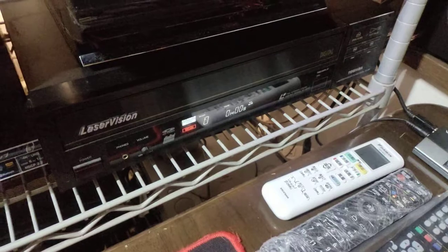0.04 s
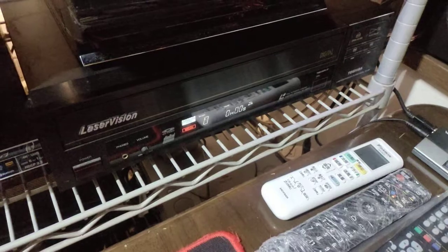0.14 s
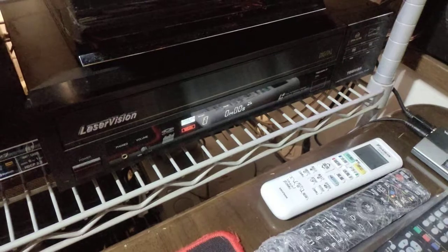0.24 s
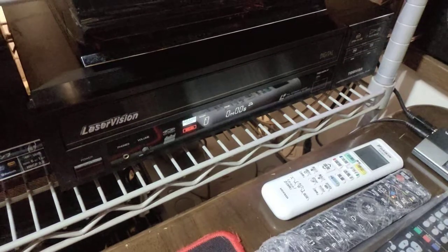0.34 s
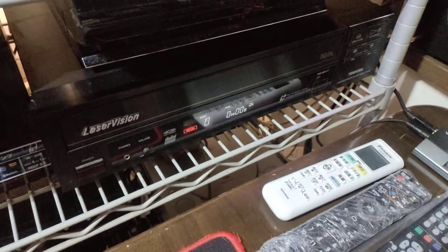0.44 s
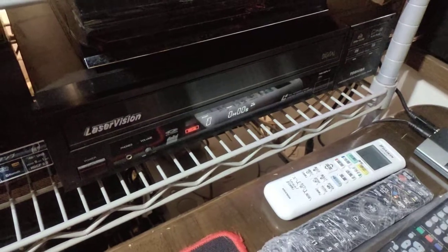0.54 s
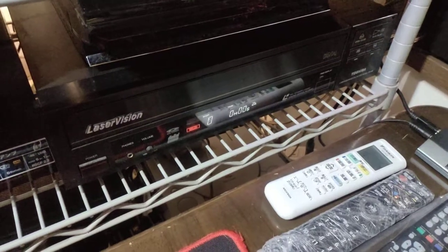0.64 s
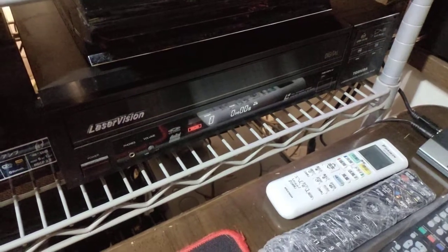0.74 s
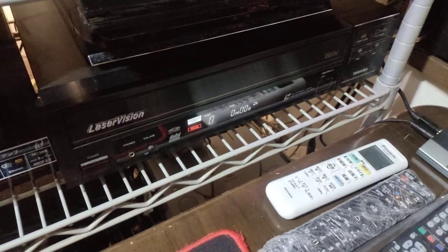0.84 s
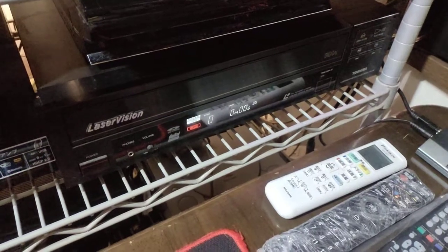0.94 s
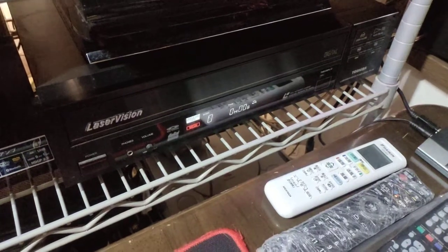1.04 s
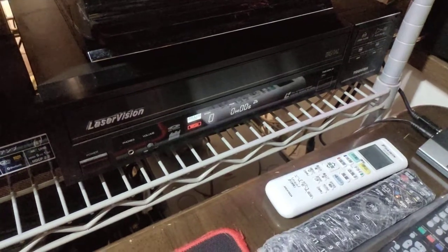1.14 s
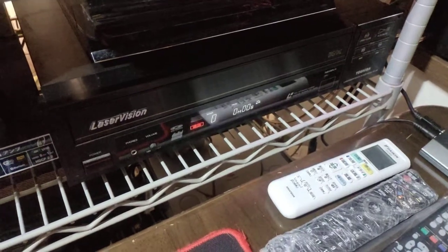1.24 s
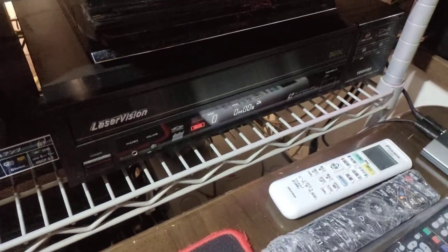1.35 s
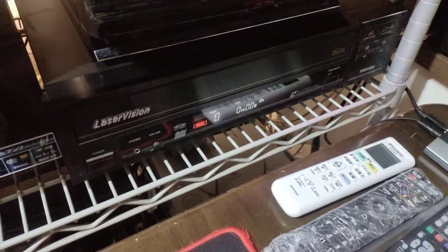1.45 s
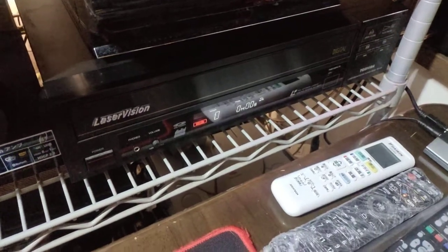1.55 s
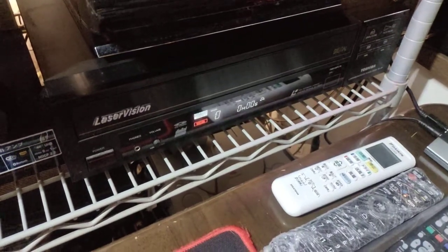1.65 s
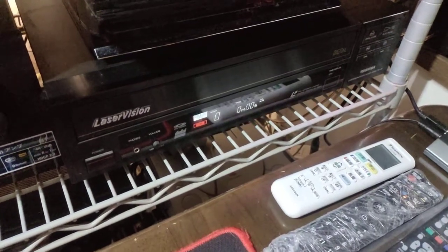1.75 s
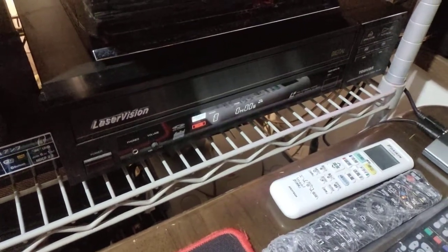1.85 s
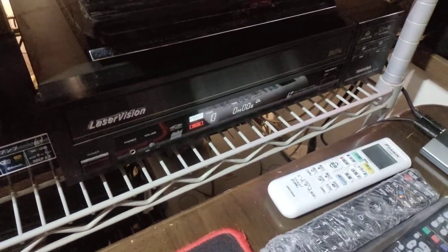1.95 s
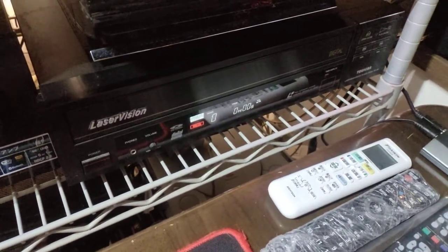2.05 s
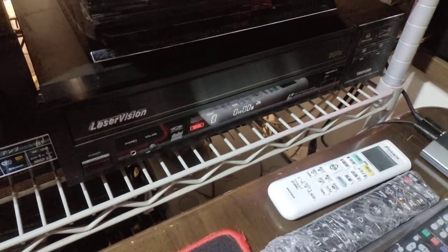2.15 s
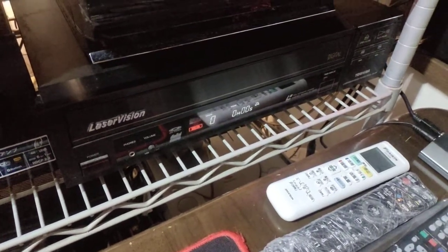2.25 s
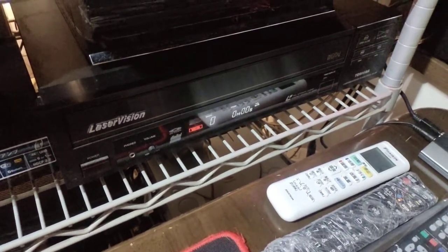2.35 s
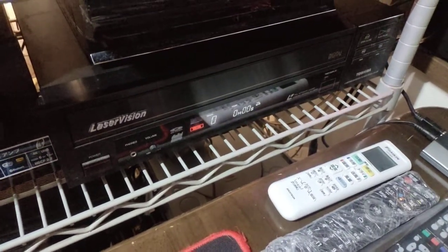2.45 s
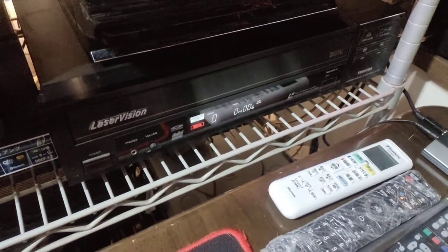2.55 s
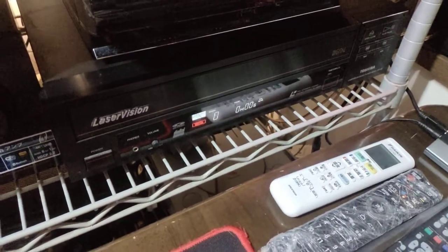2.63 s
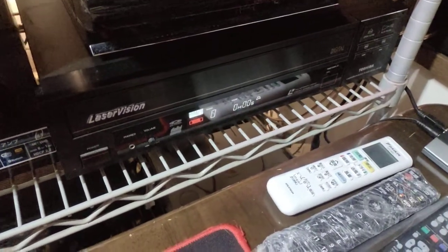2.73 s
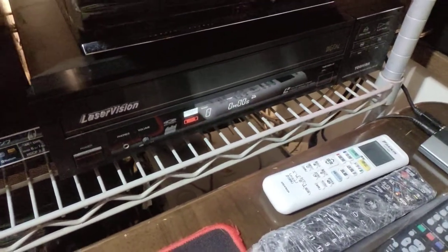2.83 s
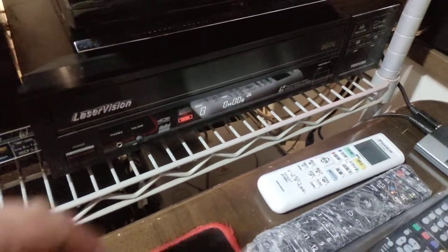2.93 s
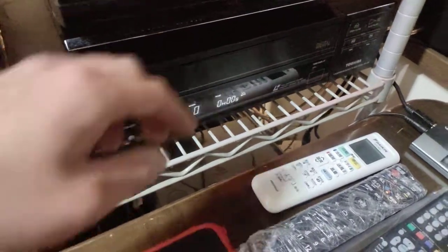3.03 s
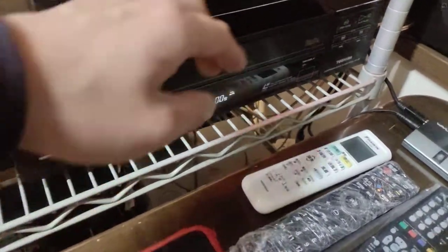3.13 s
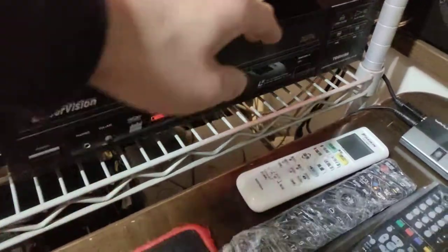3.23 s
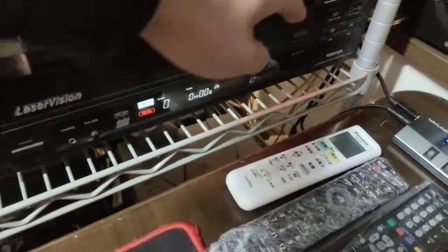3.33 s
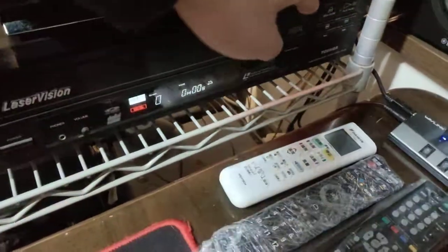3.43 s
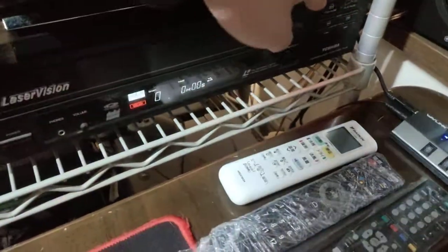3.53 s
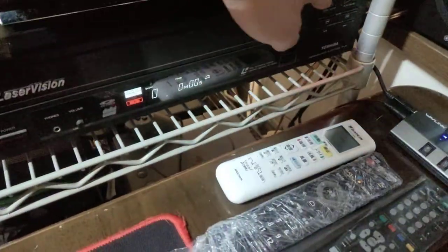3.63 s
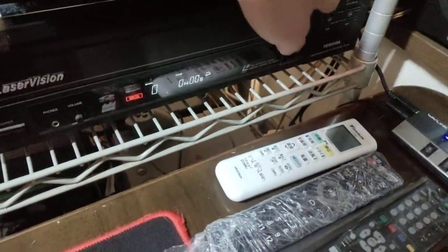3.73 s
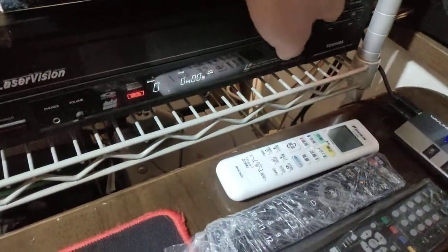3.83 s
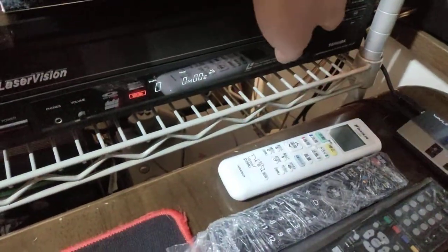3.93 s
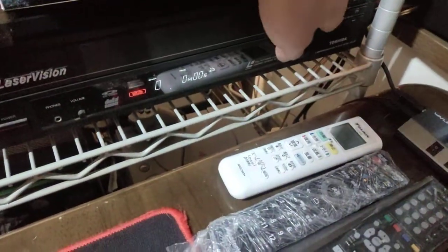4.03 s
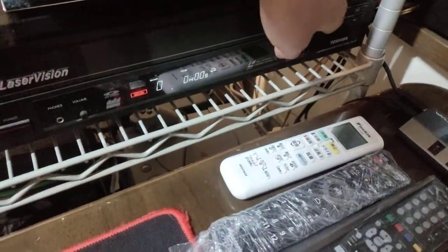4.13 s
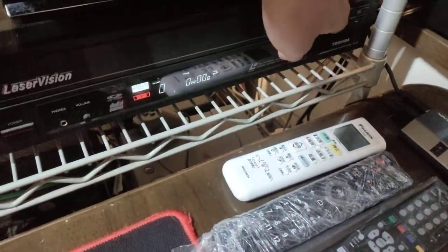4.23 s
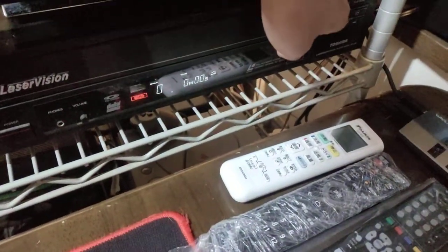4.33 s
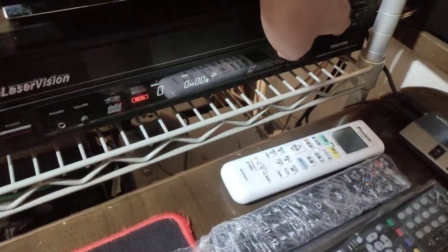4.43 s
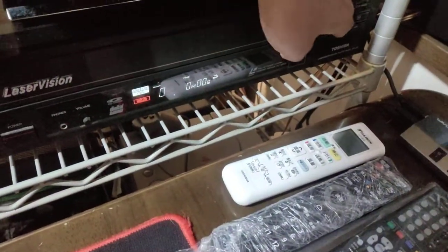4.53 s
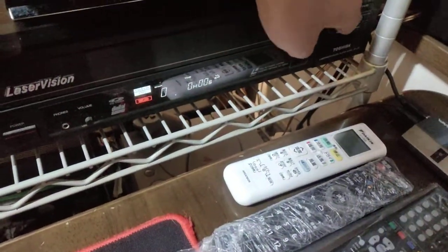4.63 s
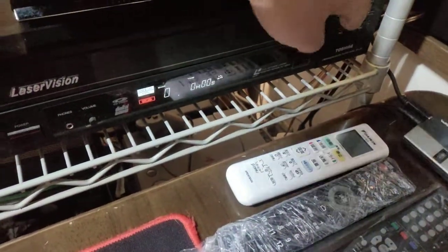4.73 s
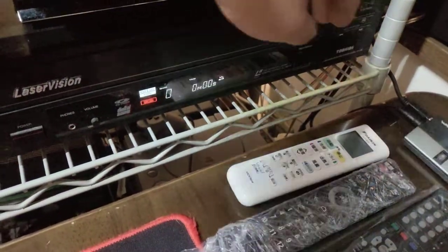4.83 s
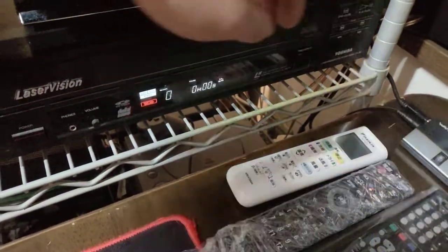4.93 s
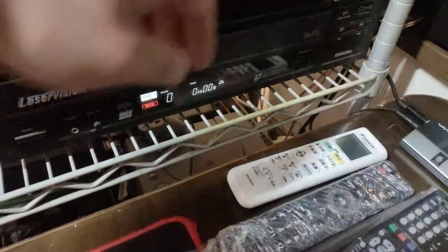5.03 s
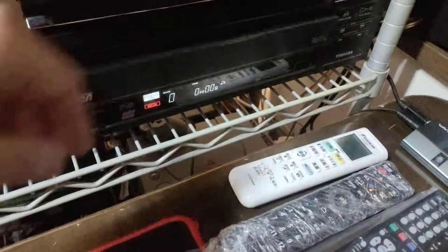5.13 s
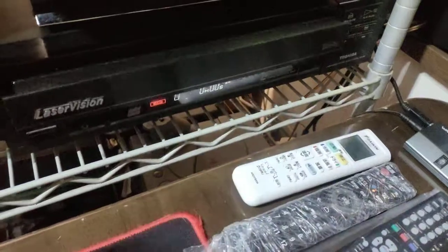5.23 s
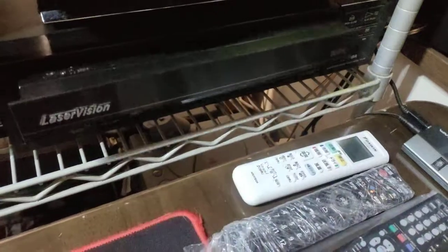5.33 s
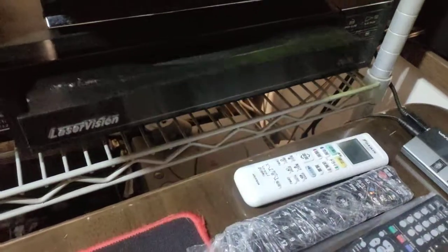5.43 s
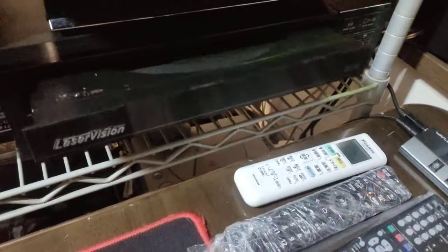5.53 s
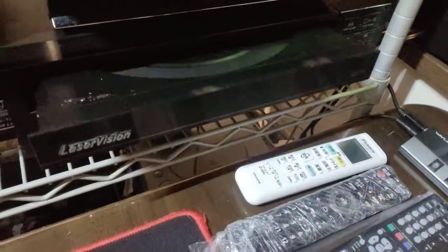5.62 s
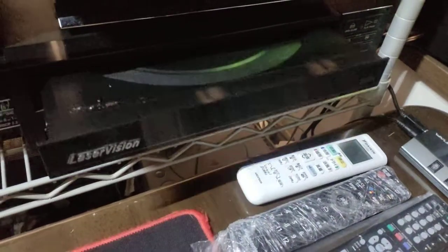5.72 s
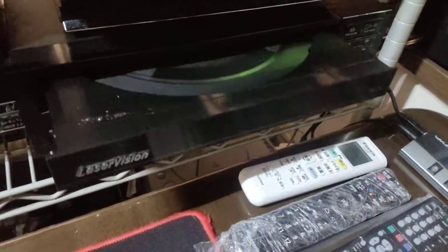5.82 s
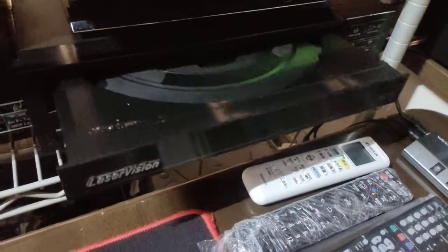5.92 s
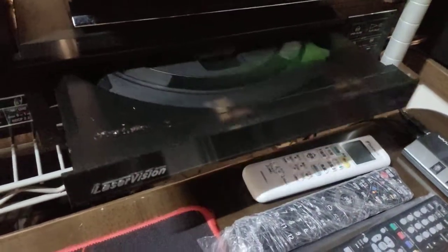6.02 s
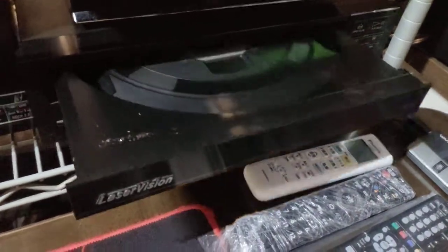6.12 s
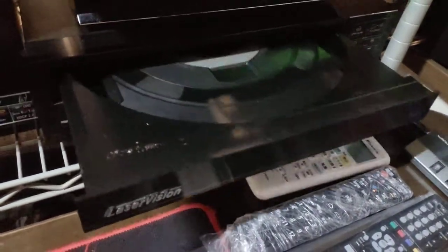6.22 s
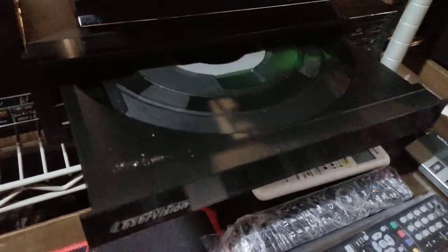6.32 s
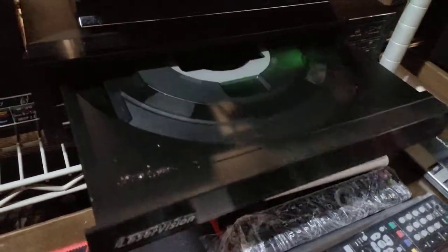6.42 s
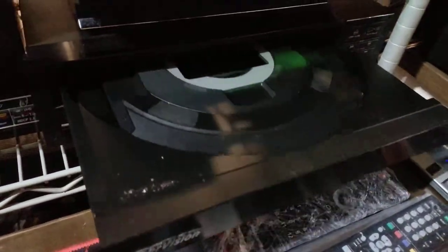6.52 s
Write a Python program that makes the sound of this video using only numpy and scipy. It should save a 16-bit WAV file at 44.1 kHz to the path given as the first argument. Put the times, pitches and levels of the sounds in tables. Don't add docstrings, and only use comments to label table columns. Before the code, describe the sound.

A small motor whines inside a player, its gears clunk twice, then a key clicks and a plastic tray rumbles out in a quiet room.

```python
import sys
import numpy as np
from scipy import signal
from scipy.fft import rfft, irfft, next_fast_len
from scipy.io import wavfile

SR = 44100
rng = np.random.default_rng(int(sys.argv[2]) if len(sys.argv) > 2 else 0)


def rack_gain(trim_db):
    fader = np.asarray(trim_db, float)
    return 10 ** (fader / 20)


def transcribe(signal):
    frames = np.atleast_2d(signal).T
    limited = np.clip(frames, -1, 1)
    pcm = np.round(limited * 32767).astype(np.int16)
    wavfile.write(sys.argv[1], SR, pcm)


N = 289737
SIZE = next_fast_len(N + SR)
TIME_S = np.arange(N) / SR

# mode_hz, width_hz, level_db
PANEL_MODES = [(153, 61, -3), (205.5, 50, -2), (273.2, 28.3, 2), (298, 104, -13.5)]


def unit(x):
    return x / np.sqrt(np.mean(x ** 2, axis=-1, keepdims=True) + 1e-20)


def on_grid(rows, order=1):
    rows = np.array(rows)
    hz = np.maximum(np.arange(SIZE // 2 + 1) * SR / SIZE, 1)
    return np.interp(np.log(hz), np.log(np.maximum(rows[:, 0], 1)), rows[:, order])


def coloured(x, spectrum):
    gain = rack_gain(on_grid(spectrum))
    return irfft(rfft(x, SIZE) * unit(gain), SIZE)[..., :N]


def resonate(x, modes):
    out, power = 0, 0
    for k, (hz, width_hz, level_db) in enumerate(modes):
        r = np.exp(-np.pi * width_hz / SR)
        b = [(1 - r * r) / 2, 0, (r * r - 1) / 2]
        a = [1, -2 * r * np.cos(2 * np.pi * hz / SR), r * r]
        sign = (-1) ** k
        out = out + sign * rack_gain(level_db) * signal.lfilter(b, a, x + 1e-18)
        power += rack_gain(2 * level_db) * np.pi * width_hz / SR
    return out / np.sqrt(power)


def high_pass(x, order, hz):
    return signal.sosfilt(signal.butter(order, hz, "high", fs=SR, output="sos"), x)


def drift(rate_hz):
    r = np.exp(-2 * np.pi * rate_hz / SR)
    return unit(signal.lfilter([1], [1, -2 * r, r * r], rng.standard_normal(N + SR))[SR:])


def noise():
    return rng.standard_normal((2, N))


def sine(hz, t):
    return np.sin(2 * np.pi * hz * t)


def tone(hz):
    return np.sqrt(2) * np.sin(2 * np.pi * np.cumsum(hz) / SR) * [[1], [0]]


def decay(t, t60_s):
    return rack_gain(-60 * t / t60_s)


def span(start_s, t):
    return slice(round(start_s * SR), round(start_s * SR) + len(t))


def swells(rows, rise_db_per_s, fall_db_per_s):
    t, out = np.arange(0, N + 16, 16) / SR, 0
    for start_s, hold_s, *levels_db in rows:
        early_s, late_s = np.maximum(start_s - t, 0), np.maximum(t - start_s - hold_s, 0)
        shape = rack_gain(-rise_db_per_s * early_s - fall_db_per_s * late_s)
        out = out + (rack_gain(np.array(levels_db))[:, None] * shape) ** 2
    return np.array([np.interp(TIME_S, t, np.sqrt(gain)) for gain in out])


def case(x):
    # mode_hz, width_hz, level_db
    case_modes = [(545, 7.2, -1.5), (1075, 79, 3), (2080, 64, -9), (2910, 230, -8.5), (4540, 150, -51)]
    # freq_hz, density_db (per Hz)
    case_spread = [(180, -44), (300, -7), (493, -6.5), (545, -2.5), (896, -11), (1110, -4), (1710, -11),
                   (2160, -14), (6450, -30.5), (9770, -41), (15800, -60)]
    return 0.5 * resonate(x, case_modes) + 0.75 * coloured(x, case_spread)


def knocks():
    parts = {"lever": (682, 5900), "cam": (684, 3900), "arm": (590, 6230), "slide": (696, 4800),
             "rack": (755, 6600), "gear": (1140, 6430), "catch": (1115, 4500), "pawl": (2110, 3300)}
    # start_s, peak_db, thump_db (re peak), tick_db (re peak), part
    engage = [(1.159, -36.5, -24, -40, "catch"), (1.211, -34, -31, -1, "pawl"),
              (1.224, -31.5, -20, 2.5, "arm"), (1.287, -33, -16, -16, "slide"),
              (1.3, -34, -18, -7, "lever"), (1.322, -27, -19, -4.5, "gear"), (1.344, -34, -0.5, 3.5, "cam"),
              (1.374, -26, -28, -4, "pawl"), (1.384, -32.5, -14, 0.5, "lever"),
              (1.407, -26.5, -11, -5, "catch"), (1.424, -27, -25, -11, "gear"),
              (1.439, -29, -9, -32, "catch")]
    settle = [(1.736, -48.5, -8, -9, "arm"), (1.775, -44.5, -6, -11, "catch"),
              (1.84, -47, -8, -23, "lever"), (1.863, -44, -18, -25, "catch"), (1.924, -34, -17, -27, "arm"),
              (1.942, -25.5, -23, -4.5, "arm"), (1.959, -27, -32, -25, "rack"),
              (1.984, -30.5, -26, -4, "arm"), (1.994, -28.5, -30, -13, "rack"),
              (2.019, -47, -6, -31, "rack"), (2.059, -40.5, -15, -26, "cam"), (2.13, -46.5, -3, -34, "cam"),
              (3.039, -62, 9, -5, "slide")]
    unlatch = [(4.572, -46, -13, -28, "lever"), (4.586, -37.5, -2.5, -6, "slide"),
               (4.62, -35.5, -9, 1.5, "gear"), (4.639, -45, -7, 4, "lever"),
               (4.678, -35, -15, -30, "lever"), (4.718, -31.5, -19, -7, "gear"),
               (4.741, -35, 0, 1, "slide"), (4.781, -38, -13, 6, "lever"), (4.804, -28, -20, -8.5, "slide"),
               (4.819, -31.5, -16, -13, "rack"), (4.844, -38, -17, -26, "cam"),
               (4.889, -50, -2, -24, "catch"), (5.061, -30.5, 0.5, -12, "rack"),
               (5.084, -29, -11, 1, "lever"), (5.109, -37, -2, -14, "lever")]
    t = np.arange(SR // 6) / SR
    body, thump, own = np.zeros((3, 2, N))
    dying = np.tanh(t / 0.0011) * (decay(t, 0.08) + rack_gain(-10) * decay(t, 0.21))
    thump_shape = np.tanh(t / 0.0055) * decay(t, 0.047)
    tick_shape = np.tanh(t / 0.0008) * (decay(t, 0.043) + rack_gain(-14.0) * decay(t, 0.16))
    for start_s, peak_db, thump_db, tick_db, part in engage + settle + unlatch:
        ring_hz, tick_hz = parts[part]
        at, draw = span(start_s, t), rng.standard_normal((4, 2, len(t)))
        body[:, at] += rack_gain(peak_db - 7.5) * dying * draw[0]
        thump[:, at] += rack_gain(peak_db + thump_db + 3.5) * thump_shape * draw[1]
        own[:, at] += rack_gain(peak_db - 15.0) * resonate(dying * draw[3], [(ring_hz, 0.06 * ring_hz, 0)])
        ringing = decay(t, 33 / ring_hz) * np.tanh(t / 0.0013) * sine(ring_hz, t)
        own[0, at] += rack_gain(peak_db - 11.5) * ringing
        bright = resonate(draw[2], [(tick_hz, 900, 0), (6000, 2600, -9), (14600, 1500, -12)])
        bright = resonate(bright, [(6270, 9300, 3), (13700, 3800, -1.0)])
        own[:, at] += rack_gain(peak_db + tick_db - 5.0) * tick_shape * bright
    return case(body) + resonate(thump, PANEL_MODES) + own


def thuds():
    # start_s, peak_db, pitch_hz
    landings = [
        (1.346, -23, 274),
        (1.923, -29, 180),
        (1.949, -26.5, 286),
        (4.163, -49.5, 165),
        (4.3, -52, 269),
        (4.742, -20.5, 271.4),
        (5.07, -42, 265),
    ]
    out, t = np.zeros((2, N)), np.arange(SR // 4) / SR
    shelf = rack_gain(-4.5) * decay(t, 0.042) * sine(161.5, t)
    for start_s, peak_db, hz in landings:
        panel = decay(t, 29.3 / hz) * sine(hz, t)
        out[0, span(start_s, t)] += rack_gain(peak_db - 4) * np.tanh(t / 0.0035) * (panel + shelf)
    return out


def rings():
    # start_s, peak_db, pitch_hz, t60_s
    ringing_parts = [(1.162, -45, 750, .08), (1.175, -52, 2090, .06), (1.214, -38, 3000, .04),
                     (1.226, -38.5, 545, .08), (1.24, -41, 1050, .07), (1.29, -42, 760, 0.061),
                     (1.297, -42, 1150, .04), (1.323, -29, 1090, .045), (1.376, -38, 2030, 0.079),
                     (1.39, -49, 760, 0.062), (1.415, -38, 551, 0.15), (1.425, -44, 1060, 0.077),
                     (1.44, -42, 1990, 0.13), (1.5, -45, 545, 0.079), (1.552, -59, 654, .05),
                     (1.736, -46, 545, 0.058), (1.778, -54, 1500, .06), (1.912, -44, 560, 0.069),
                     (1.96, -35, 787, 0.16), (1.985, -33, 779, 0.14), (2.012, -47, 800, 0.075),
                     (2.035, -48, 383, 0.19), (2.081, -48, 538, .07), (2.084, -50, 1050, 0.045),
                     (2.107, -48, 530, .06), (2.125, -49, 886, 0.092), (2.13, -49, 410, 0.097),
                     (2.194, -49.5, 386, 0.041), (4.127, -38, 7450, 0.014), (4.127, -46, 2400, .025),
                     (4.127, -47, 3400, .02), (4.128, -52, 5430, 0.017), (4.296, -48, 3500, 0.023),
                     (4.2, -59, 687, 0.23), (4.296, -41, 1940, 0.034), (4.59, -41, 3000, .04),
                     (4.625, -48, 1130, 0.053), (4.65, -46, 1250, 0.08), (4.7, -41, 1100, 0.065),
                     (4.76, -49, 1180, 0.061), (4.782, -39, 1500, .06), (4.81, -36, 726, 0.062),
                     (4.829, -42, 1040, .08), (4.845, -44, 2070, 0.072), (4.87, -48, 1130, .08),
                     (4.895, -51, 545, 0.1), (4.941, -47, 520, 0.077), (5.055, -30, 5480, .02),
                     (5.055, -36, 2630, 0.026), (4.977, -51, 518, 0.076),
                     (.791, -56, 1200, .03), (1.21, -40, 195, .08), (1.265, -42, 255, .08), (1.29, -41, 285, .06),
              (1.382, -38, 255, .08), (1.432, -36, 255, .09), (1.47, -44, 215, .09), (1.505, -48, 270, .08),
              (1.74, -52, 280, .1), (1.8, -52, 270, .1), (4.59, -45, 155, .08), (4.69, -44, 160, .08),
              (1.22, -43, 150, .08), (1.18, -45, 760, .06), (1.255, -45, 720, .05), (4.3, -50, 3200, .02),
              (4.58, -43, 260, .06), (4.61, -43, 300, .06), (4.64, -41, 260, .06), (4.72, -39, 285, .05),
              (4.78, -37, 235, .07), (4.808, -38, 260, .06), (4.83, -38, 305, .07), (4.86, -41, 215, .08),
              (4.88, -42, 260, .08), (5.053, -30, 310, .04), (5.071, -37, 300, .04), (5.084, -39, 270, .06),
              (5.109, -40, 360, .04), (4.785, -42, 2150, .05), (4.803, -40, 2900, .04),
              (4.69, -46, 1300, .06), (4.895, -49, 1200, .05), (1.395, -44, 2080, .08),
              (1.33, -44, 3000, .04), (1.308, -40, 600, .05), (1.385, -42, 690, .05),
              (5.06, -36, 1000, .04), (4.299, -50, 2500, .02)]
    out, t = np.zeros((2, N)), np.arange(SR // 4) / SR
    for start_s, peak_db, hz, t60_s in ringing_parts:
        out[0, span(start_s, t)] += rack_gain(peak_db) * decay(t, t60_s) * np.tanh(t / 0.0018) * sine(hz, t)
    return out


def snaps():
    # start_s, peak_db, edge_db (re peak), ring_hz, t60_s
    clicks = [(1.909, -39, -9, 1980, 0.05), (1.91, -34, -8, 4370, 0.052), (3.85, -53.5, -2, 3600, 0.018),
              (4.128, -36.5, -3, 2920, 0.013), (4.127, -43, -3, 5270, 0.012), (4.273, -53, -9, 5400, 0.033),
              (4.296, -43, -16, 1830, 0.03), (4.295, -46.5, -20, 3300, 0.021), (4.74, -29, -4, 4560, 0.023),
              (5.037, -42, -3, 6600, 0.028), (5.054, -25.5, 3, 3150, 0.035), (5.057, -30, -18, 1730, 0.1),
              (5.774, -48, 8, 3000, 0.06), (1.778, -53, -6, 2000, .03)]
    out, t = np.zeros((2, N)), np.arange(SR // 5) / SR
    for start_s, peak_db, edge_db, ring_hz, t60_s in clicks:
        at, draw = span(start_s, t), rng.standard_normal((3, 2, len(t)))
        draw = draw * (decay(t, max(t60_s, .01)) + rack_gain(-31.0) * decay(t, 0.4))
        modes = [(ring_hz, .17 * ring_hz, 0), (.72 * ring_hz, .14 * ring_hz, -6)]
        out[:, at] += rack_gain(peak_db - 9) * resonate(draw[0], modes)
        damping = max(ring_hz / 57, .55 / t60_s)
        piece = sine(ring_hz, t) + 0.42 * sine(0.706 * ring_hz, t)
        out[:, at] += rack_gain(peak_db - 5 - 60 * t * damping) * piece
        edge = resonate(draw[1], [(4560, 3700, 0), (7750, 3200, 0)])
        out[:, at] += rack_gain(peak_db + edge_db - 5.0) * edge
        top = resonate(draw[2], [(9700, 2500, -9.5), (14300, 1500, -4)])
        out[:, at] += rack_gain(peak_db + edge_db - 12.0) * top
    return out


def rattle():
    # start_s, hold_s, rattle_db, boom_db
    shakes = [(1.21, 0.029, -41, -38), (1.3, 0.13, -44.5, -39), (1.82, 0.046, -54.5, -56),
              (1.925, 0.14, -45, -43), (2.07, 0.057, -53, -53), (1.46, 0.02, -51, -53),
              (4.16, 0.14, -60, -62), (4.595, 0.16, -41, -42), (4.78, 0.055, -39, -36.5),
              (4.61, .01, -46, -50), (4.67, .05, -47, -50), (4.84, 0.046, -47, -46), (4.92, 0.18, -51, -61),
              (5.18, 0.07, -56, -50)]
    # start_s, hold_s, boom_db
    weights = [
        (1.35, 0.0043, -48),
        (1.955, .005, -41),
        (4.305, 0.0044, -50.5),
        (4.75, 0.0043, -43),
    ]
    level, boom = swells(shakes, 323, 137)
    boom = boom + swells(weights, 604, 339)
    chatter = level * rack_gain(2.66 * drift(16) - 4.5) * case(noise())
    return chatter + boom * rack_gain(2.1 * drift(10) - 7.0) * resonate(noise(), PANEL_MODES)


def mesh_and_teeth():
    # start_s, hold_s, rumble_db, panel_ring_db, tray_ring_db
    drive = [
        (4.92, .1, -76, -62.5, -73),
        (5.075, 0.0068, -48, -43, -48),
        (5.24, 0.52, -53, -61.5, -60),
        (5.88, 0.15, -51, -60, -60),
        (6.04, 0.52, -52.5, -63, -59.5),
    ]
    # start_s, peak_db
    rack_teeth = [(5.23, -63), (5.299, -57), (5.386, -33), (5.485, -33.5), (5.538, -40), (5.583, -36.5),
                  (5.688, -41.5), (5.828, -37), (5.958, -41), (6.049, -48), (6.2, -35), (6.298, -38),
                  (6.356, -63), (6.409, -40.5), (6.472, -41)]
    rumble, panel, ring = swells(drive, 135, 136)
    tooth_hz = 20.5
    throb = rack_gain(1.8 * np.sin(2 * np.pi * tooth_hz * TIME_S + 2.03) + 0.3 * drift(48))
    mesh = noise() * rumble * throb * rack_gain(1.6 * drift(156) - 1.5)
    bumps = 0
    for start_s, peak_db in rack_teeth:
        after_s = TIME_S - start_s - .006
        width_s = np.where(after_s < 0, .005, .011)
        bumps = bumps + rack_gain(peak_db - 7.5) * np.exp(-(after_s / width_s) ** 2)
    return mesh, noise() * bumps, panel, ring


def gear_song():
    gear_hz = [942, 1132, 648, 1538, 597, 626]
    # start_s, hold_s, then level_db of each gear
    gear_load = [(5.36, .07, -61, -72, -75, -57, -78, -76), (5.47, .05, -63, -57, -68, -51, -78, -76),
                 (5.58, .12, -65, -63, -75, -58, -78, -63), (5.77, .16, -60, -61, -75, -55, -72, -76),
                 (5.98, .04, -74, -62, -70, -64, -66, -60), (6.08, .14, -70, -64, -58, -70, -66, -76),
                 (6.27, .06, -59, -70, -58, -70, -68, -76), (6.38, .2, -64, -65, -64, -70, -62, -76)]
    loads = swells(gear_load, 180, 170)
    song = 0
    for hz, load in zip(gear_hz, loads):
        song = song + load * rack_gain(1.2 * drift(5.7)) * tone(hz * (1 + 0.00297 * drift(6)))
    return song


def drive_hum():
    # start_s, hold_s, level_db
    hums = [
        (4.35, .3, -86),
        (4.78, 0.33, -65.5),
        (5.55, 0.14, -71),
        (6.08, 0.22, -72),
    ]
    return swells(hums, 23, 62) * tone(77.2 + 6.0 * (TIME_S - 3.3))


def tray():
    # mode_hz, width_hz, level_db
    tray_modes = [(171, 32, -9), (544, 28, -7), (948, 24, -4), (1094, 15, -15), (1250, 27, -3),
                  (1518, 38, 1.5), (1880, 12, -6), (2244, 30, -8), (2800, 200, -12.5), (3150, 40, -23),
                  (3360, 20, -8), (4300, 74, -15.5)]
    # freq_hz, density_db (per Hz)
    tray_spread = [(59, -38), (100, -12), (282, -7.5), (443, -10.5), (565, -5.5), (1370, -6.5),
                   (1560, -4.5), (9000, -38), (11700, -56), (19800, -120)]
    mesh, teeth, panel, ring = mesh_and_teeth()
    push = mesh + 0.62 * teeth
    body = 0
    for hz, width_hz, level_db in tray_modes:
        gain = rack_gain(level_db + 1.6 * drift(1.3))
        body = body + gain * np.sqrt(width_hz) * resonate(push, [(hz, width_hz, 0)])
    gap_hz = 3154 + 268 * np.cos(2 * np.pi * (TIME_S - 5.27) / .6)
    gap = signal.lfilter([.1], [1, -.991], push) * tone(gap_hz)[0]
    ringing = panel * resonate(noise(), [(272.0, 30, 0)])
    ringing = ringing + ring * resonate(noise(), [(653, 43, 2.0), (571.0, 49, -4.0)])
    clatter = resonate(teeth, [(1150, 260, 3.5), (1586, 110, 8), (2100, 270, -6.5), (3280, 260, 1.0)])
    out = rack_gain(-24) * body + rack_gain(-7) * gap + rack_gain(-1.5) * coloured(mesh, tray_spread)
    return out + rack_gain(-2.0) * clatter + ringing + gear_song() + drive_hum()


def rubbing():
    # start_s, hold_s, level_db
    rubs = [
        (3.17, 0.19, -70),
        (3.5, 0.17, -73.5),
        (3.86, 0.18, -73.5),
        (5.17, 0.54, -70),
        (5.9, 0.15, -67.5),
        (6.3, 0.18, -61),
    ]
    # start_s, hold_s, level_db
    scuffs = [
        (5.772, 0.066, -48),
    ]
    # freq_hz, density_db (per Hz)
    rub_colour = [(1470, 1), (2500, -6), (3590, -6.5), (4030, -7.5), (6920, -11), (11700, -13), (13500, -8),
                  (15800, -17)]
    level = swells(rubs, 59, 56) * rack_gain(1.2 * drift(16))
    scuff = swells(scuffs, 4002, 380)
    fine = high_pass(coloured(noise(), rub_colour), 2, 1100)
    finer = high_pass(fine, 1, 7000)
    return rack_gain(6.5) * (level * fine + scuff * finer)


def motor():
    # start_s, hold_s, whine_db, brush_db
    runs = [
        (0.08, 0.84, -67, -68),
        (4.27, 0.047, -72, -65.5),
    ]
    # pitch_hz, level_db (re whine)
    can_lines = [(646.5, -9), (970, -13), (1151, -12)]
    # mode_hz, width_hz, level_db
    can_modes = [(585, 97, -1.5), (1160, 44, -1.5), (2374, 140, -11.5), (6330, 950, -23)]
    whine, brush = swells(runs, 63, 92)
    wobble = 1 + .0025 * drift(12)
    hz = (599 - 1.8 * TIME_S) * wobble
    octave_db = np.maximum(-0.8 - 12 * TIME_S, -14)
    song = rack_gain(350 * (wobble - 1)) * tone(hz) + rack_gain(octave_db) * tone(2 * hz)
    for line_hz, level_db in can_lines:
        song = song + rack_gain(level_db) * tone(line_hz * wobble)
    return whine * song + brush * rack_gain(1.0 * drift(5.5)) * resonate(noise(), can_modes)


def room():
    # freq_hz, density_db (per Hz)
    murmur_colour = [(15, -71), (25, -25), (53, -32), (74, -14), (157, -2.5), (236, -5), (382, -11.5),
                     (442, -13), (619, -10.5), (848, -15.5), (934, -21.5), (1190, -18), (1480, -16),
                     (2510, -28.5), (8000, -51), (10400, -59), (17600, -120)]
    # pitch_hz, level_db (rms)
    fan_tones = [(646.0, -80), (904.4, -78), (969.0, -76.5), (1389.0, -86)]
    tones = sum(rack_gain(level_db) * tone(np.full(N, hz)) for hz, level_db in fan_tones)
    murmur = coloured(noise(), murmur_colour)
    murmur = murmur + rack_gain(-25.0) * resonate(murmur, [(674.5, 27, 0)])
    return rack_gain(-62 + .6 * drift(3)) * murmur + tones


def ports(pair, order):
    # freq_hz, near_likeness, room_likeness (0 to 1)
    likeness = [(60, 0.99, 0.87), (298, 0.94, 0.67), (650, 0.78, 0.74), (1250, 0.53, 0.34),
                (2160, 0.3, 0.23), (4960, 0.042, 0.038), (15000, 0.14, .05)]
    # freq_hz, left_lead_rad
    port_lead = [(30, 0), (150, -.1), (300, -.21), (600, -.43), (1120, -.75), (1460, -2.8), (1890, -3.0),
                 (2300, -1.6), (4000, -2.9), (8000, -5.7), (16000, -11.4)]
    shared, apart = rfft(pair, SIZE)
    alike = np.clip(on_grid(likeness, order=order), 0, 1)
    common, own = np.sqrt((1 + alike) / 2) * shared, np.sqrt((1 - alike) / 2) * apart
    lead = np.exp(.5j * on_grid(port_lead))
    return irfft([(common + own) * lead, (common - own) / lead], SIZE)[:, :N]


def scene():
    near = knocks() + rings() + thuds() + snaps() + rattle() + tray() + rubbing() + motor()
    near = high_pass(near, 4, 78)
    return rack_gain(2.5) * ports(near, order=1) + ports(room(), order=2)


def top_cut(x):
    return signal.sosfilt(signal.butter(12, 16670, fs=SR, output="sos"), x)


def record(dry):
    # freq_hz, left_db, right_db
    port_colour = [(60, -1, -2), (495, -1.5, -1.5), (1110, -3, -3), (2060, 1.87, -0.5), (3000, 5, -2),
                   (3890, -1, 1), (4840, -12, 2), (6800, -23, 5), (7220, -4, 6), (8900, 0, -6),
                   (11800, -7, -1.5), (13050, 3, -5.5), (14800, -15, 5.5), (15500, -18, 7)]
    # freq_hz, left_db, right_db
    port_hiss = [(30, -99, -80), (1050, -54, -56), (4930, -69, -67.5), (7300, -71, -70), (7900, -71, -72),
                 (11200, -72, -73), (15100, -71.5, -66.5)]
    colour = rack_gain(np.array([on_grid(port_colour, order=1), on_grid(port_colour, order=2)]))
    hiss = rack_gain(np.array([on_grid(port_hiss, order=1), on_grid(port_hiss, order=2)]))
    heard = irfft(rfft(dry, SIZE) * colour + rfft(noise(), SIZE) * hiss, SIZE)[:, :N]
    heard = signal.sosfilt(signal.cheby2(20, 24, 15640, fs=SR, output="sos"), heard)
    return top_cut(heard)


dry = scene()
out = record(dry)
transcribe(out)
```